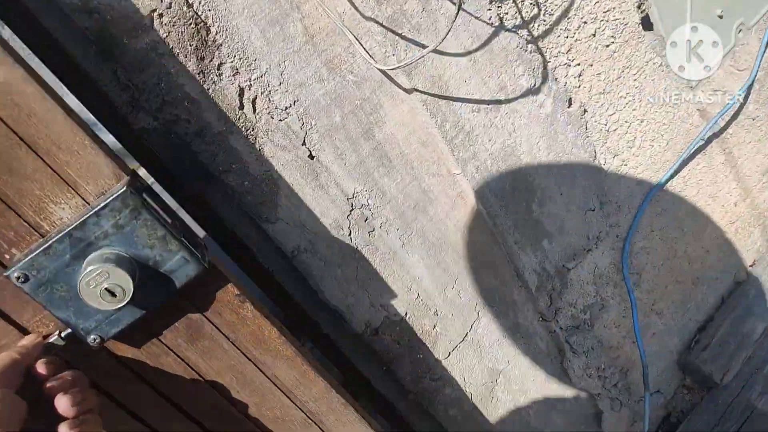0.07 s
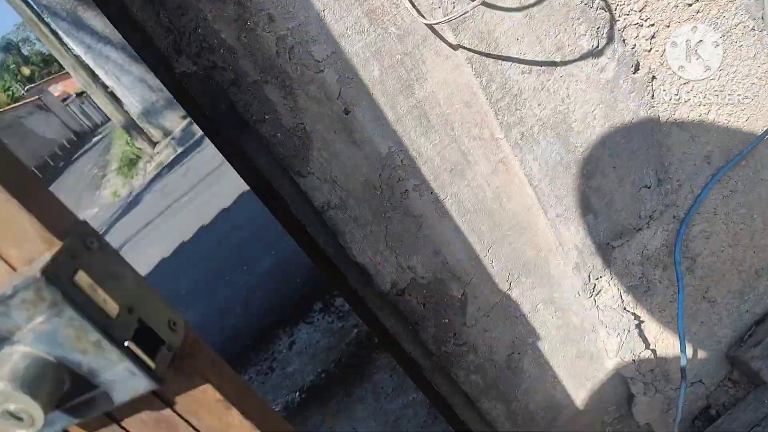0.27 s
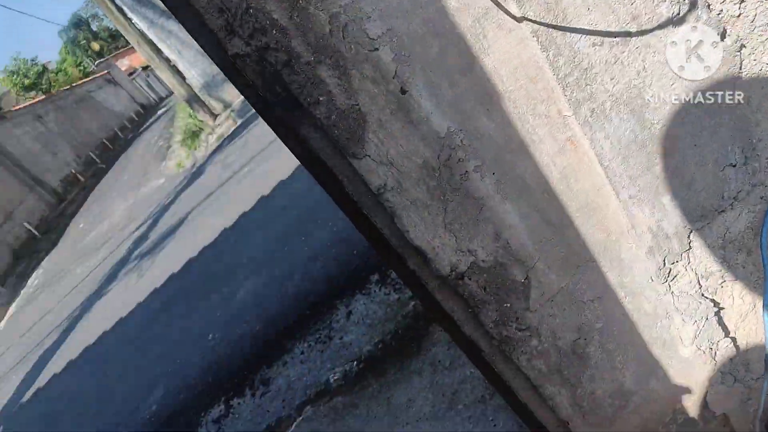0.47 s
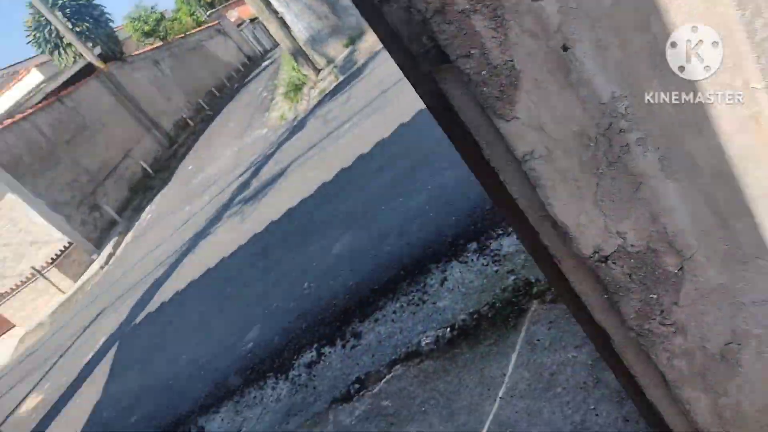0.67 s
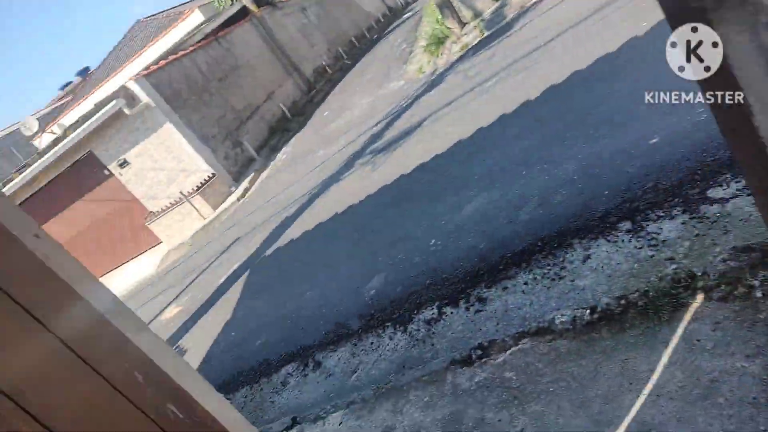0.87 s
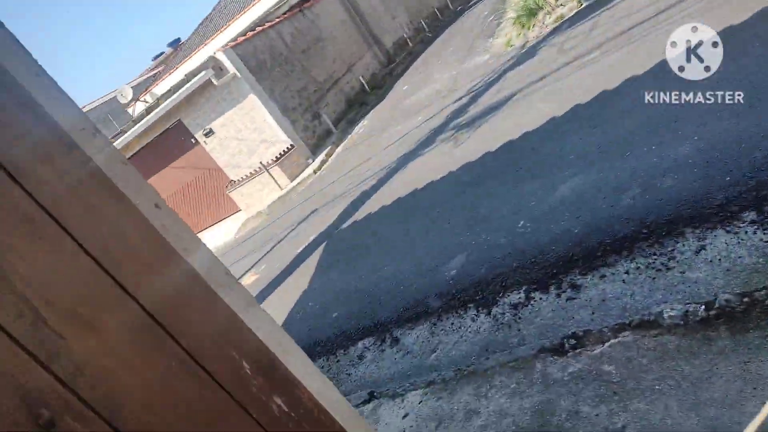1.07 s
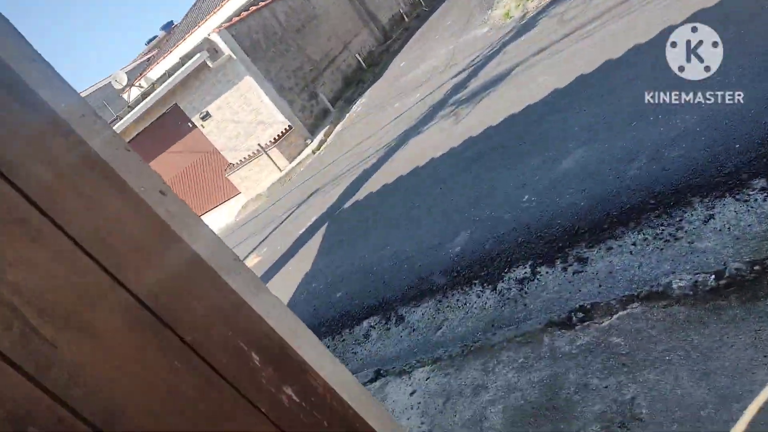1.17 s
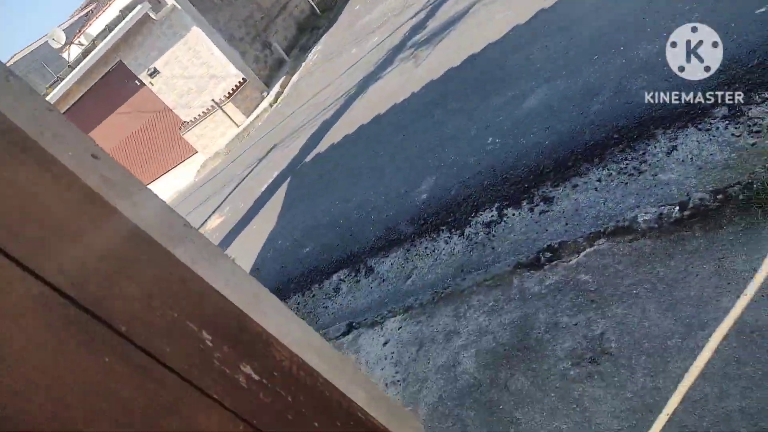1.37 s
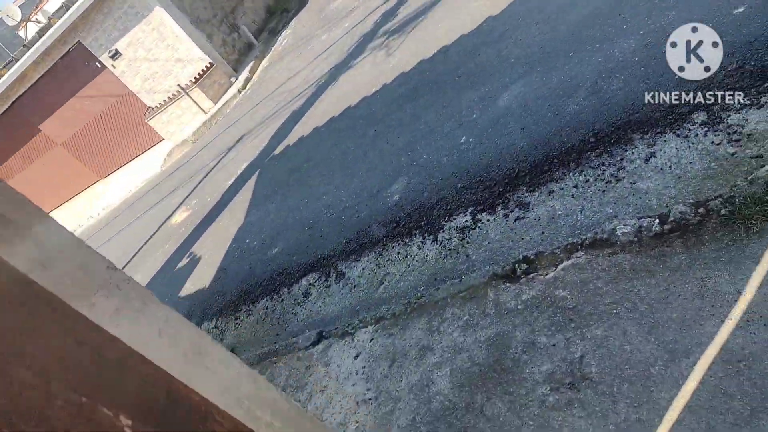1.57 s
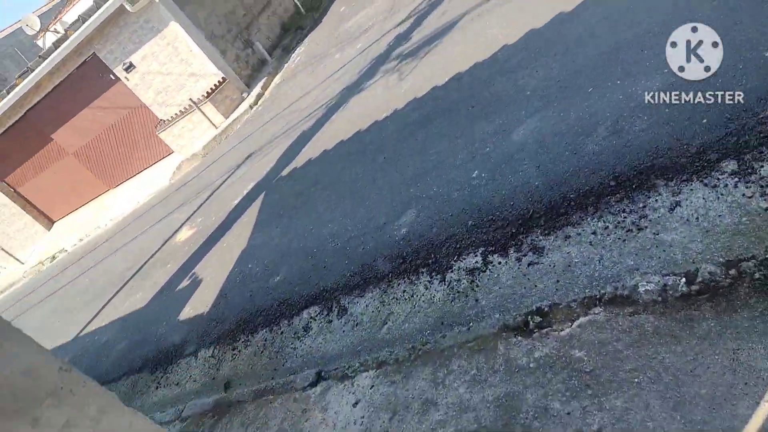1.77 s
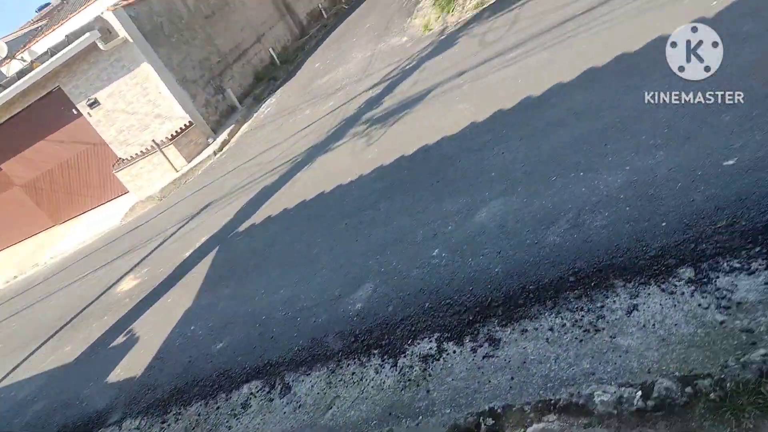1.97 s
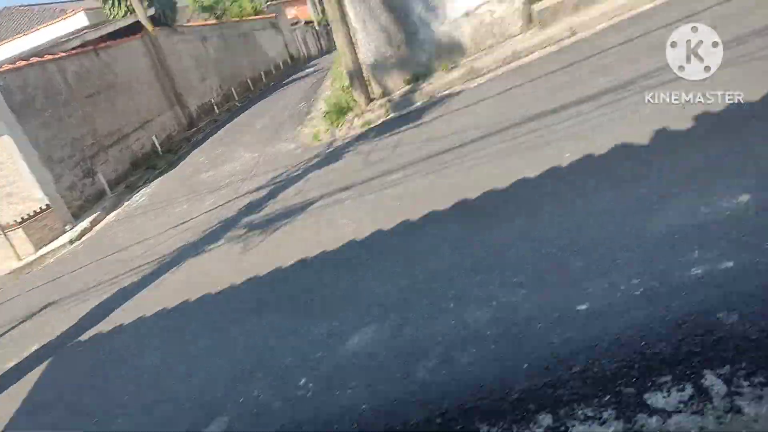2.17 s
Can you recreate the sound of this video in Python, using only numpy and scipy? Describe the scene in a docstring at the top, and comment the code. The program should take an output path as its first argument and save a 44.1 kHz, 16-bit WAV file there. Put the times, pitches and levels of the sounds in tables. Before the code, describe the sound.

A gate lock clicks, then the dry hinge squeals and groans as the gate opens.

```python
"""A quiet street, at a wooden gate, the microphone hand-held and close to the lock.
Over a low rumble the key rubs, the lock clicks and its sliding bolt chirps. As the gate swings open,
the dry hinge squeals in three falling steps, sticks and slips in a judder and a sinking groan, rubs on
quietly and creaks again at the end. Puffs of air buffet the microphone; the yard walls echo briefly."""
import sys
import numpy as np
from scipy import signal
from scipy.fft import rfft, irfft, next_fast_len
from scipy.io import wavfile
from scipy.ndimage import uniform_filter1d

SR = 44100
rng = np.random.default_rng(int(sys.argv[2]) if len(sys.argv) > 2 else 0)


def master(y):
    """Save y as 16-bit WAV."""
    cut = np.clip(np.atleast_2d(y).T, -1, 1)
    pcm = np.round(cut * 32767)  # scale
    wavfile.write(sys.argv[1], SR, pcm.astype(np.int16))


N = 97990

# street rumble behind the gate (frequency [Hz], gain [dB])
STREET_SPECTRUM = [(20, -55), (60, -8.5), (110, -1), (190, 0), (300, -13.5), (480, -15.5), (800, -31),
                   (1500, -37.5), (2300, -42.5), (4000, -54.5), (8000, -56.5), (15000, -50)]
# its rise and fall (time [s], level [dB])
STREET_SWELL = [(0, -49), (0.28, -50.5), (0.9, -47), (1.1, -43.5), (1.4, -41.5), (1.6, -42), (1.85, -44),
                (1.98, -43.5), (2.22, -45)]
# key turning and bolt sliding, then the hinge rubbing (time [s], level [dB])
KEY_RUB_LEVEL = [(0, -64), (0.06, -61), (0.13, -59), (0.19, -72), (0.24, -71.5), (0.42, -65.5),
                 (0.47, -53.5), (0.55, -58.5), (0.62, -64), (0.75, -69.5)]
HINGE_RUB_LEVEL = [(0.94, -108), (0.98, -52.5), (1.05, -46.5), (1.15, -44.5), (1.26, -46), (1.35, -40.5),
                   (1.47, -42.5), (1.52, -51.5), (1.62, -55), (1.72, -56.5), (1.83, -54.5), (1.92, -63),
                   (2.05, -66.5), (2.22, -71)]
# metal sliding on metal (frequency [Hz], gain [dB])
RUB_SPECTRUM = [(100, -33), (450, 4.5), (800, -1), (1150, -6.5), (1700, 6.5), (2600, 2), (4200, -6),
                (6000, -9.5), (10000, -14.5), (15000, -22.5)]
# lock clicks (time [s], level [dB], left over right [dB], treble tilt [dB/octave], bolt ring [dB])
LOCK_CLICKS = [(0.039, -59, 3, 4, -17), (0.108, -49.5, -11, -10, -20), (0.142, -53, -6, 1, -34),
               (0.172, -51.5, 1, 2, -15), (0.187, -54.5, -5, -2, -5), (0.414, -46, 6, 9, -9),
               (0.488, -31, 20, 7, -33), (0.4896, -23.5, -9, 1.5, 6.5), (0.4935, -28.5, -0.5, -5.5, -20),
               (0.6518, -40.5, 19, 1, -12.5), (0.6635, -38, -14.5, -1.5, -16.5), (0.666, -33, 2, -1, -23),
               (0.67, -44, 1, -7.5, -19), (2.069, -43.5, 2, 0, -0.5), (2.099, -51, 6, 6, -22)]
# crack that starts each click (frequency [Hz], gain [dB])
CRACK_SPECTRUM = [(100, -8), (400, -9), (900, -10.5), (1500, 6.5), (2400, -2), (3000, 6), (4200, -1.5),
                  (8000, -10), (14000, -27), (16000, -23)]
# modes of the lock case and the bolt (frequency [Hz], gain [dB], T60 [s])
CASE_RING = [(1330, -25, 0.11), (1547, -21.5, 0.1), (1690, -19.5, 0.078), (2070, -11.5, 0.088),
             (2310, -20, 0.11)]
BOLT_RING = [(2750, -10.5, 0.03), (2930, 2, 0.02), (3180, -12.5, 0.027), (5400, -33, 0.18),
             (6220, -30.5, 0.15)]
# decay of the echoes in the yard (frequency [Hz], T60 [s])
YARD_DECAY = [(200, 0.47), (800, 0.31), (2200, 0.2), (6000, 0.097), (14000, 0.098)]
# chirp of the sliding bolt (time [s], pitch [Hz], level [dB])
BOLT_CHIRP = [(0.118, 9789, -80), (0.138, 9699, -45.5), (0.15, 9652, -39.5), (0.172, 9646, -52),
              (0.2, 9643, -65), (0.23, 9645, -66), (0.25, 9645, -87), (0.319, 9645, -87)]
# puffs of air on the microphone (time [s], half-width [s], left level [dB], right level [dB])
AIR_PUFFS = [(0.345, 0.043, -37, -57), (0.582, 0.013, -28.5, -62), (0.629, 0.02, -24.5, -50),
             (0.678, 0.016, -20.5, -63), (0.707, 0.01, -21, -46), (0.837, 0.024, -22.5, -35.5),
             (0.924, 0.042, -30.5, -37.5), (0.977, 0.019, -27, -38), (1.017, 0.049, -32.5, -30.5),
             (1.159, 0.02, -31, -46), (1.199, .012, -25, -58), (1.477, 0.011, -34.5, -50)]
# turbulence in a puff (frequency [Hz], gain [dB])
PUFF_SPECTRUM = [(20, -47), (50, -19.5), (80, -2.5), (120, -2), (170, -11.5), (260, -18.5), (450, -44),
                 (1000, -54), (4000, -77)]
# hinge squeal, one table a step (time [s], pitch [Hz], gains of harmonics 1, 2, 3 [dB],
# left over right of harmonic 1 [dB], left over right of the others [dB])
SQUEAL_STEPS = [
    [(0.93, 2514, -63, -99, -99, -25, 2.0), (0.956, 2485, -49.5, -100, -107, -31, 3.0),
     (0.966, 2510, -34, -50, -103, -27, 2.8), (0.978, 2520, -37.5, -38.5, -57, -8.5, 2.6),
     (1.012, 2533, -30.5, -40.5, -63, 1, 16), (1.054, 2516, -29.5, -29.5, -64, -3, 3.5),
     (1.066, 2465, -31, -31.5, -71, 5, 1.2)],
    [(1.074, 2328, -25, -45, -51, -7.5, 25), (1.11, 2297, -28.5, -37.5, -48.5, 8, -17),
     (1.176, 2280, -34, -34, -46, 9, 15), (1.22, 2250, -31.5, -31, -45, 11, 3),
     (1.258, 2236, -36.5, -40, -55.5, 0.0, -8), (1.268, 2250, -38, -75, -66, -20, 8),
     (1.28, 2200, -29, -28.5, -48, 14, 10)],
    [(1.29, 2076, -24.5, -28, -45, -27, -4), (1.298, 2063, -25, -29, -35, 5, 1),
     (1.314, 1993, -23, -27.5, -36.5, -17, 6), (1.322, 1992, -35, -28.5, -47, -18, -8)],
]
# squeal harmonics 4, 5, 6 (gain over the third [dB])
SQUEAL_OVERTONES = [-16, -21, -20]
# stick-slip strokes of the hinge (time [s], slip rate [Hz], level before the ringing [dB])
JUDDER_STROKE = [(1.316, 164, -29), (1.326, 171, -27.5), (1.345, 173, -25.5), (1.376, 171, -28),
                 (1.395, 210, -33), (1.41, 130, -44)]
GROAN_STROKE = [(1.32, 662, -31.5), (1.38, 682, -27.5), (1.396, 682.8, -30), (1.42, 719.3, -24),
                (1.432, 712.4, -33.5), (1.444, 633.3, -26.5), (1.456, 589.2, -33), (1.472, 473.5, -33),
                (1.486, 448.6, -38), (1.505, 450, -84)]
# response of hinge and wooden leaf to each stroke (frequency [Hz], gain [dB])
JUDDER_BODY = [(200, -38), (550, -36), (720, -8), (1050, -38.5), (1400, -7), (1720, -8.5), (1900, 7),
               (2070, 2.5), (2300, -11), (2600, -0.5), (3000, -8), (3300, 4.5), (4400, -6), (4900, -12),
               (6600, -19), (8500, -64), (15000, -78)]
GROAN_BODY = [(300, -20.5), (700, -14), (950, -5.5), (1400, -5.5), (2050, -6.5), (2700, -5), (3450, 4),
              (4300, -6), (5000, -15.5), (7200, -20), (8500, -28.5), (15000, -70)]
# slow slips of the last creak (time [s], level [dB])
CREAK_SLIPS = [(2.1142, -35.5), (2.1238, -36.5), (2.135, -40), (2.145, -35), (2.158, -37), (2.1711, -38.5),
               (2.182, -36), (2.195, -38.5), (2.2063, -37)]
# noise of a knock on the leaf (frequency [Hz], gain [dB])
LEAF_SPECTRUM = [(150, -18), (450, -14), (680, -21), (900, 10.5), (1300, -5.5), (1600, -8), (2100, -1),
                 (3400, -4), (4400, -12), (5200, -35), (8000, -27), (15000, -55)]
# modes of the leaf (frequency [Hz], gain [dB], T60 [s])
LEAF_RING = [(888, -6.5, 0.18), (986.5, -10, 0.094), (1083, -8, 0.068), (1272, -5, 0.053),
             (2010, -14, 0.098), (2700, -36, 0.035), (2870, -27, 0.044), (3120, -1, 0.018),
             (3320, -4, 0.038), (4130, -18, 0.034)]

STREET_LIKENESS, RUB_LIKENESS, KNOCK_LIKENESS = 0.67, 0.2, 0.4  # left-right correlation
HINGE_LEAD_S = .00044  # the hinge reaches the left channel first
BAND_LIMIT_HZ = 15550
T = np.arange(N) / SR


def amp(db):
    """Decibels to gain."""
    return 10 ** (np.asarray(db) / 20)


def unit(x):
    """Scales to rms 1."""
    return x / np.sqrt(np.mean(x ** 2) + 1e-20)


def decay(t, t60_s, db=0):
    """Gain that starts at db and falls 60 dB in t60_s."""
    return amp(db - 60 * t / t60_s)


def read(points, hz):
    """Reads a curve on a log-frequency axis."""
    f, value = np.transpose(points)
    return np.interp(np.log(hz + 1), np.log(f), value)


def level(points):
    """Gain over time from (time [s], level [dB]) rows."""
    return amp(np.interp(T, *np.transpose(points)))


def pan(db):
    """Left and right gains of mean 1, the left louder by db."""
    left = amp(np.atleast_1d(db))
    return 2 * np.array([left, np.ones_like(left)]) / (1 + left)


def add(mix, s, sound):
    """Mixes a stereo sound in at time s."""
    part = mix[:, max(round(s * SR), 0):][:, :sound.shape[1]]
    part += sound[:, :part.shape[1]]


def noise(likeness, size):
    """Two partly alike channels of white noise."""
    a, b = rng.standard_normal((2, size))
    return np.array([a, likeness * a + np.sqrt(1 - likeness ** 2) * b])


def colour(x, spectrum, tilt_db=0):
    """Causal filter with the given spectrum, tilted per octave between 1 and 12 kHz."""
    hz = abs(np.fft.fftfreq(4096, 1 / SR))
    octaves = np.log2(np.clip(hz, 1000, 12000) / 3000)
    log_gain = np.log(amp(read(spectrum, hz) + tilt_db * octaves))
    minimum_phase = np.exp(np.conj(signal.hilbert(log_gain)))
    taps = np.fft.ifft(minimum_phase).real[:2048]
    return signal.fftconvolve(x, taps[None], axes=1)[:, :x.shape[1]]


def hiss(spectrum, likeness, size, tilt_db=0):
    """Coloured stereo noise of rms 1."""
    return unit(colour(noise(likeness, size), spectrum, tilt_db))


def waver(size):
    """Quick random drift of rms 1."""
    return unit(uniform_filter1d(uniform_filter1d(rng.standard_normal(size), size=120), size=120))


def ring(modes, t):
    """Dying modes, heard with a different phase on each side."""
    return sum(decay(t, t60, db) * np.sin(2 * np.pi * hz * t + rng.uniform(-1, 1, (2, 1)))
               for hz, db, t60 in modes)


def street_rumble():
    """The street in the background: low noise that swells a little."""
    return hiss(STREET_SPECTRUM, STREET_LIKENESS, N) * level(STREET_SWELL)


def rubbing(grain_db=1.5):
    """Grainy hiss of metal sliding on metal: first the key and bolt, then the hinge."""
    grains = noise(RUB_LIKENESS, N) * amp(grain_db * waver(N))
    return unit(colour(grains, RUB_SPECTRUM)) * (level(KEY_RUB_LEVEL) + level(HINGE_RUB_LEVEL))


def lock_clicks():
    """Close to the microphone, each short crack rings the lock case and the bolt."""
    out, t = np.zeros((2, N)), np.arange(SR // 4) / SR
    for s, db, pan_db, tilt_db, bolt_db in LOCK_CLICKS:
        hit = hiss(CRACK_SPECTRUM, KNOCK_LIKENESS, len(t)) * decay(t, t60_s=0.029)
        hit += ring(CASE_RING, t) + amp(bolt_db) * ring(BOLT_RING, t)
        tail = hiss(CRACK_SPECTRUM, KNOCK_LIKENESS, len(t), tilt_db=-3.5) * decay(t, t60_s=0.21, db=-18)
        hit = colour(hit + tail, [(1, 0), (SR, 0)], tilt_db)  # tilt only
        attack_rms = np.std(hit[:, :SR // 300])
        add(out, s, amp(db) * pan(pan_db) * hit / attack_rms)
    return out


def yard_echoes(x):
    """Scattered echoes from the walls round the gate."""
    taps = rng.standard_normal((2, SR // 2)) * (rng.random((2, SR // 2)) < .08)
    taps[:, :SR // 250] = 0  # 4 ms before the first echo
    hz, t, bands = signal.stft(taps, SR, nperseg=256)
    tail = signal.istft(bands * decay(t, read(YARD_DECAY, hz)[:, None]), SR, nperseg=256)[1]
    return signal.fftconvolve(x, tail / np.linalg.norm(tail[0]), axes=1)[:, :N]


def bolt_chirp(pan_db=-12):
    """The sliding bolt gives one thin, high tone, right of the microphone."""
    s, hz, db = np.transpose(BOLT_CHIRP)
    envelope = amp(np.interp(T, s, db, left=-200, right=-200))
    cycles = np.cumsum(np.interp(T, s, hz)) / SR
    return np.sqrt(2) * envelope * np.sin(2 * np.pi * cycles) * pan(pan_db)


def air_puffs(port_top_hz=115.1, turbulence_db=-0.5):
    """Air buffets each microphone port: turbulence and a low tone in short swells."""
    out = np.zeros((2, N))
    turbulence = amp(turbulence_db) * hiss(PUFF_SPECTRUM, likeness=0, size=N)
    for s, half_width, left_db, right_db in AIR_PUFFS:
        swell = np.exp(-2 * ((T - s) / half_width) ** 2)
        port_hz = port_top_hz * rng.uniform(0.77, 1.0, (2, 1))
        tone = np.sin(2 * np.pi * (port_hz * T + rng.random((2, 1))))
        puff = (turbulence + tone) * swell
        puff *= np.linalg.norm(swell) / np.linalg.norm(puff, axis=1, keepdims=True)
        out += amp([[left_db], [right_db]]) * puff
    return out


def hinge_cycles(hz, jitter):
    """Running cycle count of the unsteady hinge as it reaches each channel."""
    cycles = np.cumsum(hz * (1 + jitter * waver(len(hz)))) / SR
    return cycles + np.array([[HINGE_LEAD_S], [0]]) * hz


def hinge_squeal(fade_s=.006, gain_db=0.5):
    """The hinge sings on one resonance, sags in pitch, then jumps to the next one down."""
    out = np.zeros((2, N))
    for step in SQUEAL_STEPS:
        s, *columns = np.transpose(step)
        hz, db1, db2, db3, pan1, pan_upper = [np.interp(T, s, c) for c in columns]
        fade = np.clip(1 + np.minimum(T - s[0], s[-1] - T) / fade_s, 0, 1)
        cycles = hinge_cycles(hz, jitter=.0015)
        harmonics_db = [db1, db2, db3] + [db3 + d for d in SQUEAL_OVERTONES]
        for k, db in enumerate(harmonics_db, 1):
            out += fade * amp(db) * pan(pan1 if k == 1 else pan_upper) * np.sin(2 * np.pi * k * cycles)
    return np.sqrt(2) * amp(gain_db) * out


def disperse(x, delay_s):
    """Bending waves in wood: low notes arrive late, by delay_s at 1 kHz."""
    size = next_fast_len(x.shape[1] + SR // 10)
    delay = delay_s * 1000 / np.maximum(np.fft.rfftfreq(size, 1 / SR), 700)
    lag_cycles = np.cumsum(delay) * SR / size
    return irfft(rfft(x, size) * np.exp(-2j * np.pi * lag_cycles), size)[:, :x.shape[1]]


def stick_slip(stroke, body, jitter, grit_start, grit_end, pan_db=-4):
    """A train of slips, each with a burst of grit, drives hinge and leaf; gives (start, sound)."""
    s, rate, db = np.transpose(stroke)
    t = np.arange(s[0], s[-1], 1 / SR)
    hz = np.interp(t, s, rate)
    cycles = hinge_cycles(hz, jitter)
    slips = unit(sum(np.cos(2 * np.pi * k * cycles) for k in range(1, int(BAND_LIMIT_HZ / hz.max()))))
    grit = unit(np.exp(-(cycles % 1) / 0.47) * noise(RUB_LIKENESS, len(t)))
    grit_share = np.interp(t, [s.mean(), s[-2]], [grit_start, grit_end])
    friction = np.sqrt(1 - grit_share ** 2) * slips + grit_share * grit
    sound = unit(disperse(colour(friction, body), delay_s=.005))
    return s[0], sound * amp(np.interp(t, s, db)) * pan(pan_db)


def resonance(x, hz, width_hz, db):
    """One narrow mode of the gate, driven by x."""
    return amp(db) * signal.lfilter(*signal.iirpeak(hz, hz / width_hz, SR), x)


def judder_and_groan():
    """The hinge sticks and slips: slowly in a judder, fast in a groan that roughens as it sinks."""
    out = np.zeros((2, N))
    add(out, *stick_slip(JUDDER_STROKE, JUDDER_BODY, jitter=.005, grit_start=.1, grit_end=.1))
    out += resonance(out, hz=1990, width_hz=110, db=-2.5)  # the squealing resonance rings on
    add(out, *stick_slip(GROAN_STROKE, GROAN_BODY, jitter=.01, grit_start=.1, grit_end=.55))
    return out + resonance(out, hz=899, width_hz=44, db=14.5)  # lowest ring of the leaf


def last_creak():
    """Separate slips knock the wooden leaf, each with fresh crumbs of friction."""
    out, t = np.zeros((2, N)), np.arange(SR // 8) / SR
    wood = hiss(LEAF_SPECTRUM, KNOCK_LIKENESS, len(t)) * decay(t, t60_s=0.051, db=0.5)
    knock = disperse(wood + ring(LEAF_RING, t), delay_s=.0065)
    knock /= np.std(knock[:, :SR // 100])
    for s, db in CREAK_SLIPS:
        grit = hiss(RUB_SPECTRUM, RUB_LIKENESS, len(t), tilt_db=-3) * decay(t, t60_s=.06, db=-3)
        add(out, s, amp(db) * (knock + grit))
    return out


def scene():
    """At the microphone: lock and hinge up close, yard and street behind, air on the ports."""
    lock = lock_clicks() + bolt_chirp()
    squeal = hinge_squeal()
    creaks = judder_and_groan() + last_creak()
    echoes = yard_echoes(amp(-15.5) * lock + amp(-7.5) * squeal + amp(-11) * creaks)
    return lock + squeal + creaks + echoes + rubbing() + street_rumble() + air_puffs()


def record(dry):
    """The recorder's band limit."""
    lowpass = signal.firwin(511, BAND_LIMIT_HZ, window=("kaiser", 9), fs=SR)
    return signal.oaconvolve(dry, lowpass[None], "same")


dry = scene()
out = record(dry)
master(out)
```